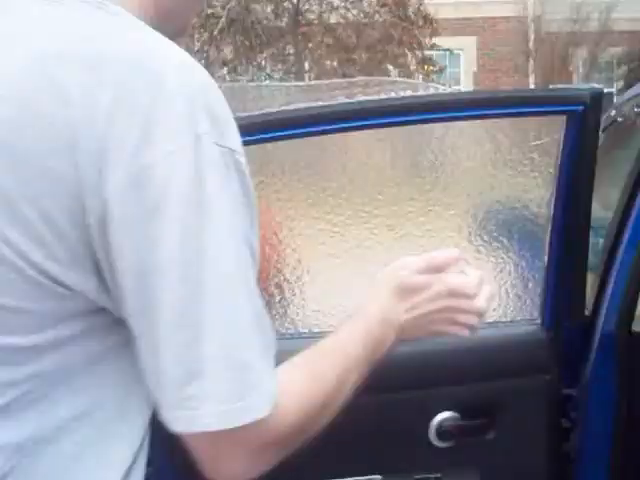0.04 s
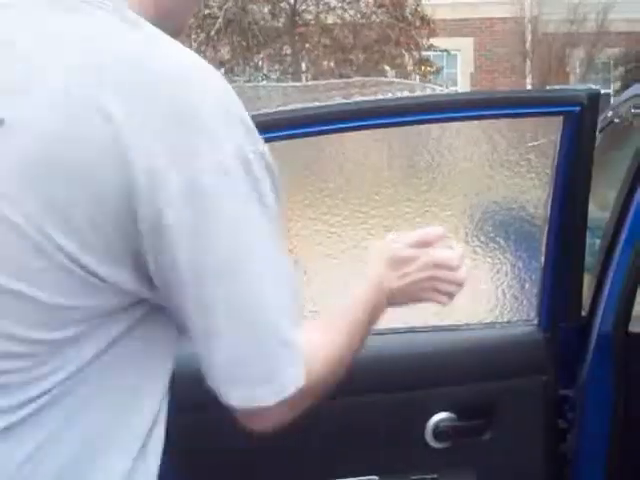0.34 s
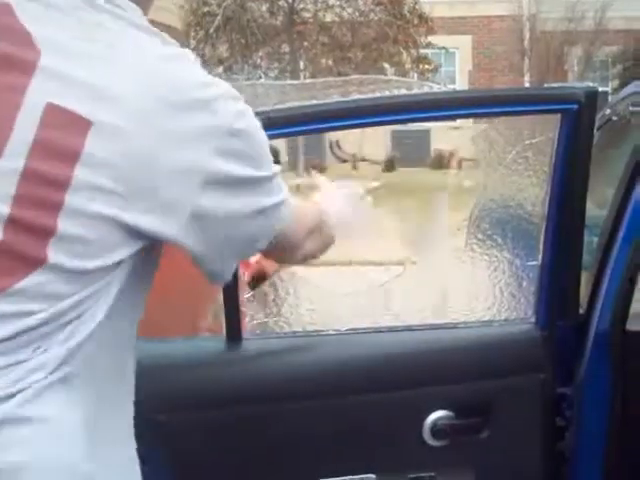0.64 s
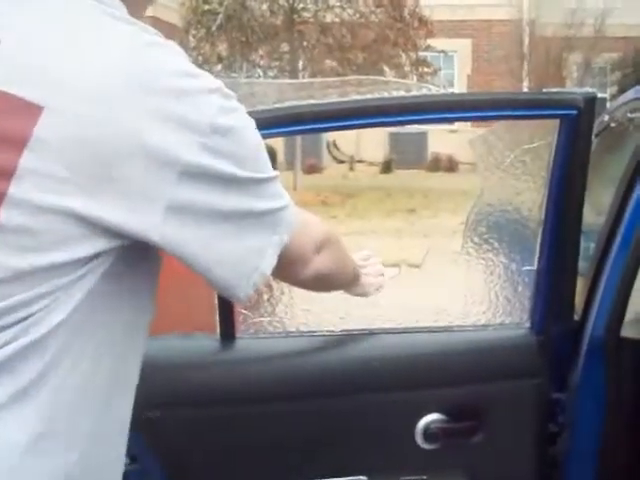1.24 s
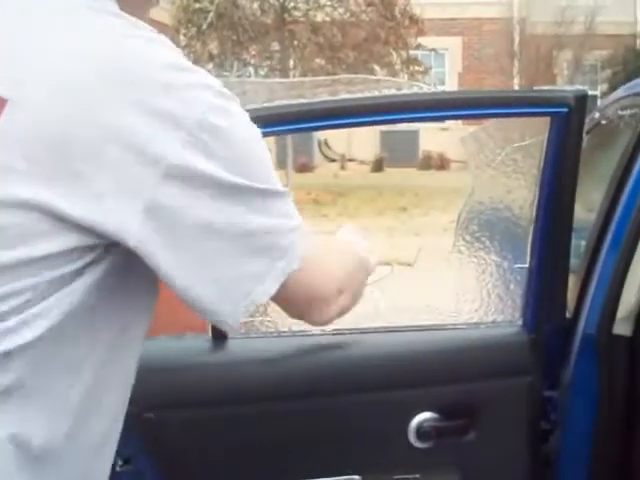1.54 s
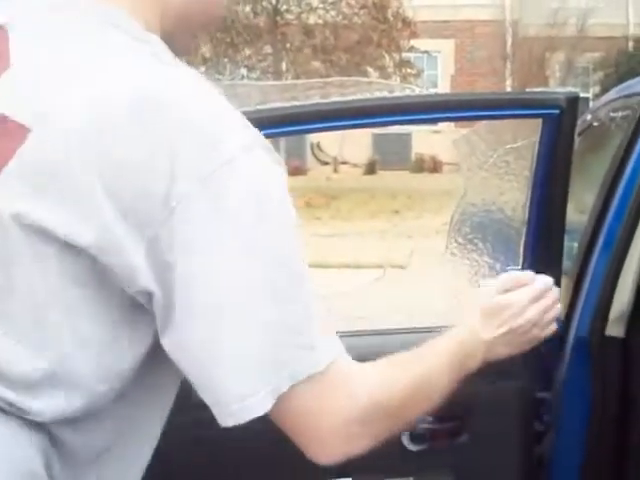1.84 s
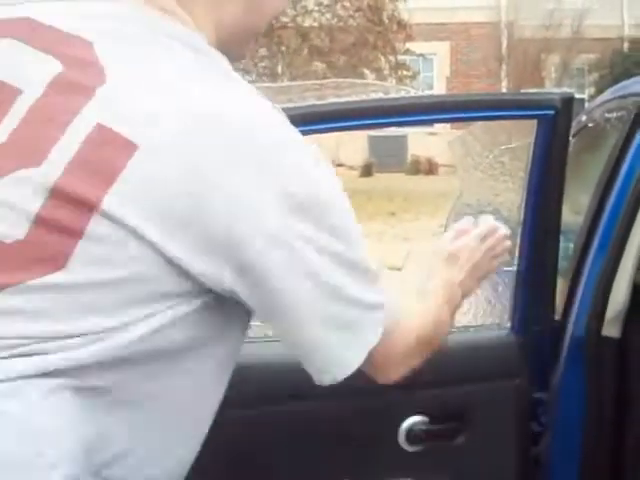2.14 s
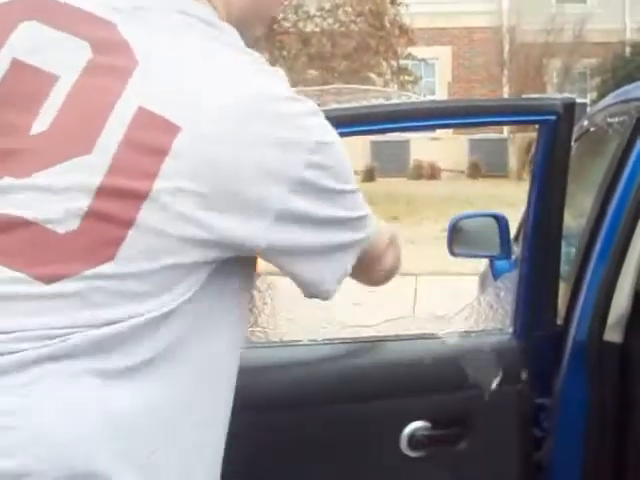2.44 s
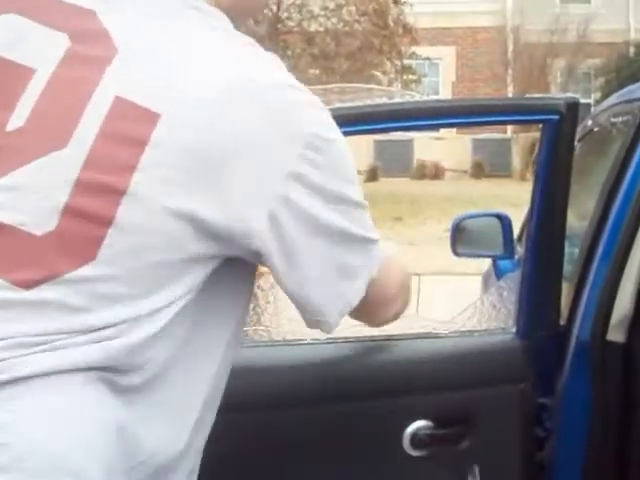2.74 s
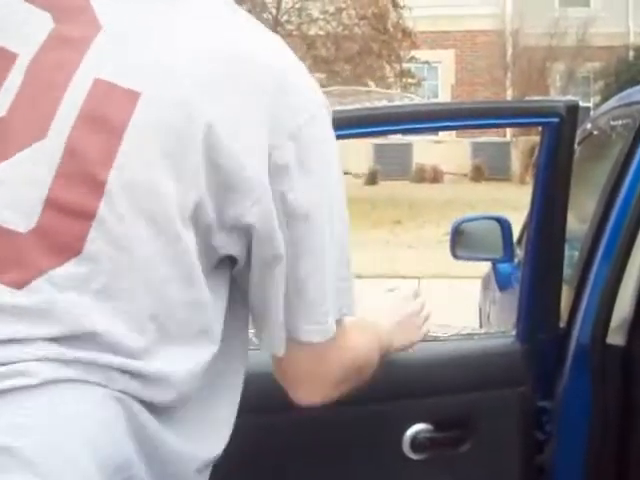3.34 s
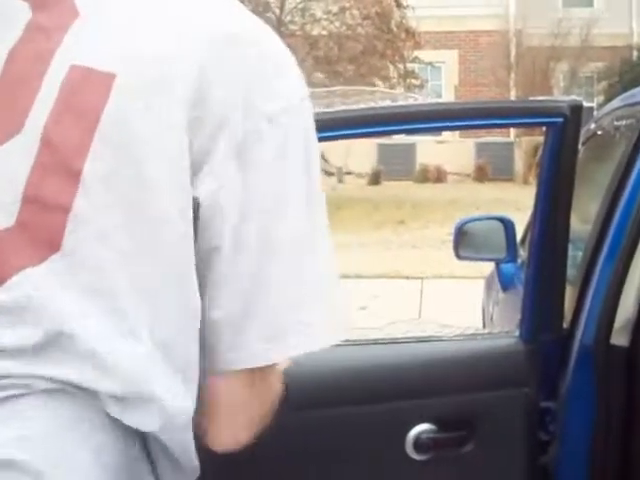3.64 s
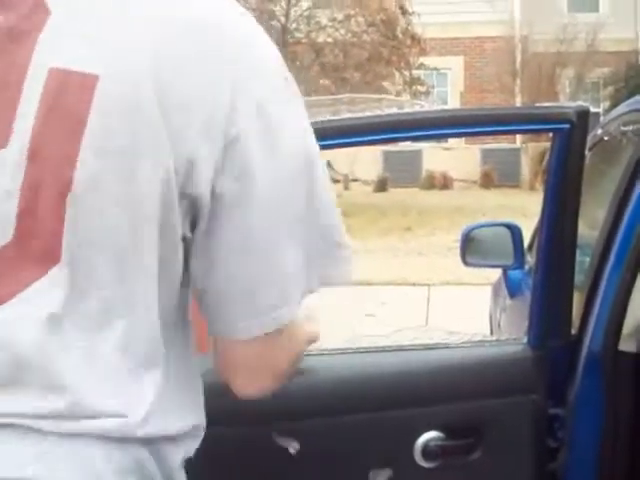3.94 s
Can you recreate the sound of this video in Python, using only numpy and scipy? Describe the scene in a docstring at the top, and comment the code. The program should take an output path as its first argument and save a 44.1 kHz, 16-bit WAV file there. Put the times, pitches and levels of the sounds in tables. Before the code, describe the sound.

Breaking ice crunches and clatters: a hand knocks it from a car door's window twice, each hit followed by shards clinking and scattering on the ground. Underneath are a low engine hum, outdoor air and soft microphone bumps.

```python
"""Knocking ice out of a car window

A hand strikes a sheet of ice in the window frame of an open car door, twice, then knocks off the rest.
Plates crack, bump the door and shatter on the pavement, where shards ring and skitter.
Underneath are the idling engine, outdoor air, faint whines, and wind and handling on the microphone."""
import sys
import numpy as np
from scipy import signal
from scipy.fft import rfft, irfft
from scipy.io import wavfile
from scipy.ndimage import uniform_filter1d

SR = 44100
rng = np.random.default_rng(int(sys.argv[2]) if len(sys.argv) > 2 else 0)


def int16_out(signal):
    """Quantize to a 16-bit WAV file."""
    q = np.round(np.clip(np.atleast_2d(signal).T, -1, 1) * 32767)
    wavfile.write(sys.argv[1], SR, q.astype(np.int16))


N = 4 * SR
TOP_HZ = 7200


def amp(db):
    """Decibels to gain."""
    return 10 ** (np.asarray(db) / 20)


def unit_rms(x):
    """Scale to rms 1."""
    return x / np.sqrt(np.mean(x ** 2) + 1e-20)


def unit_energy(x):
    """Scale to energy 1."""
    return x / np.sqrt(np.sum(x ** 2) + 1e-20)


def curve(table, column=1):
    """One column of a table, interpolated linearly in time."""
    rows = np.array(table)
    return np.interp(np.arange(N) / SR, rows[:, 0], rows[:, column])


def add(out, start_s, x):
    """Mix x into out at start_s."""
    i = max(int(start_s * SR), 0)
    out[i:i + len(x)] += x[:N - i]


def band(x, lo_hz, hi_hz, order=3):
    """Causal band-pass."""
    return signal.sosfilt(signal.butter(order, [lo_hz, hi_hz], "band", fs=SR, output="sos"), x)


def colour(x, points, size=2048):
    """Minimum-phase filter through (Hz, dB) points."""
    hz, db = np.array(points).T
    bins_hz = np.arange(size + 1) * SR / 2 / size
    gain = amp(np.interp(np.log(bins_hz + 1), np.log(hz), db))
    cepstrum = irfft(np.log(gain))
    cepstrum[1:size] *= 2
    cepstrum[size + 1:] = 0
    impulse = irfft(np.exp(rfft(cepstrum)))[:size]
    return signal.fftconvolve(x, impulse)[:len(x)]


def drift(rate_hz):
    """Smooth random drift, rms 1."""
    hold = int(SR / rate_hz)
    steps = np.repeat(rng.standard_normal(N // hold + 1), hold)
    return unit_rms(uniform_filter1d(steps, hold)[:N])


def fade(t, t60_s):
    """Decay by 60 dB in t60_s."""
    return np.exp(-np.log(1000) * t / t60_s)


def rise(t, attack_s=0.004):
    """Exponential onset from 0 to 1."""
    return 1 - np.exp(-t / attack_s)


def sine(hz, t):
    """Sine of peak 1."""
    return np.sin(2 * np.pi * hz * t)


# Each row: time in seconds, firing rate in Hz, level in dB.
IDLE = [(0, 56.76, -34.5), (1.1, 58.77, -36), (1.6, 56.28, -34.5), (2.1, 57.7, -31), (3.2, 56.77, -32),
        (4, 57.26, -35)]
# Each row: multiple of the firing rate, relative level in dB, depth of random dips in dB.
IDLE_HARMONICS = [(1, 1, 1.9), (2, -9, 9)]

def engine():
    """The idling engine hums, wavering, at harmonics of its firing rate."""
    phase = 2 * np.pi * np.cumsum(curve(IDLE)) / SR
    hum = sum(amp(db - dip_db * np.abs(drift(7.1))) * np.sin(round(k) * phase)
              for k, db, dip_db in IDLE_HARMONICS)
    return unit_rms(hum) * amp(curve(IDLE, column=2))


# Each row: frequency in Hz, relative gain in dB.
AIR_SPECTRUM = [(140, 1), (350, -8), (700, -14), (1300, -15.5), (2600, -29), (5300, -32.5), (7000, -67.5)]

def air(level_db=-47.5):
    """Outdoor air: a steady, dark hiss."""
    hiss = colour(rng.standard_normal(N), AIR_SPECTRUM)
    return amp(level_db) * unit_rms(band(hiss, 130, 2 * TOP_HZ))


# Each row: time in seconds, level in dB.
WIND_LEVELS = [(0, -34), (.3, -48), (.45, -36), (.7, -43.5), (3.05, -45.5), (3.4, -37), (3.7, -41),
               (3.92, -36.5)]
# Each row: frequency in Hz, relative gain in dB.
WIND_SPECTRUM = [(10, 7), (35, 7.5), (90, 4), (165, -7.5), (260, -43.5), (600, -54)]

def wind():
    """Gusts rumble on the microphone."""
    return unit_rms(colour(rng.standard_normal(N), WIND_SPECTRUM)) * amp(curve(WIND_LEVELS))


# Each row: frequency in Hz, level in dB.
WHISTLE_TONES = [(5362, -67), (6638, -76.5)]

def whistle():
    """A thin, continuous electrical whistle with a slight flutter."""
    t = np.arange(N) / SR
    return sum(amp(db) * unit_rms(sine(hz, t) * (1 + 0.19 * drift(160))) for hz, db in WHISTLE_TONES)


def plate(modes_hz, t60_s=0.023, tick=3.0, ring=0.66, size=3000):
    """Impulse response of an ice plate: a contact tick and short modes."""
    t = np.arange(size) / SR
    response = ring * unit_energy(sum(sine(hz, t) for hz in modes_hz) * fade(t, t60_s))
    response[0] += tick
    return response


LEAD_S = 0.005
BODY_EDGE_HZ, MID_EDGE_HZ, TREBLE_EDGE_HZ = 157, 747, 2424  # lower band edges
# Each row: frequency in Hz, relative gain in dB.
ICE_SPECTRUM = [(170, -2), (350, 1.5), (480, -5.5), (680, -5), (1000, 7), (1300, 7), (1800, 13), (2200, 7),
                (3400, 8.5), (4000, 6.5), (5400, 5), (6300, -3.5), (7000, -16)]

def fracture(crumble_s, body_db, mid_db, treble_db, cracks_per_s=2900, size=5000, mode_count=16):
    """Faint ticks, a main crack at LEAD_S and a run of further cracks ring one plate."""
    main = int(LEAD_S * SR)
    t = (np.arange(size) - main) / SR
    decay_s = np.sqrt(0.0092 * crumble_s)  # longer breaks die away more slowly
    cracks = (rng.random(size) < cracks_per_s / SR) * rng.choice([-1, 1], size)
    cracks = cracks * amp(4.5 * rng.standard_normal(size).clip(-2, 2))
    cracks[main] = amp(4)
    lead_in = amp(-17) * (1 + t / LEAD_S)
    crumbling = np.exp(-np.maximum(t - crumble_s, 0) / decay_s)
    cracks *= np.where(t < 0, lead_in, crumbling)
    positions = (np.arange(mode_count) + rng.random(mode_count)) / mode_count
    modes_hz = MID_EDGE_HZ + (TOP_HZ - MID_EDGE_HZ) * positions ** 1.4
    crunch = colour(signal.fftconvolve(cracks, plate(modes_hz))[:size], ICE_SPECTRUM)
    edges_hz = [BODY_EDGE_HZ, MID_EDGE_HZ, TREBLE_EDGE_HZ, 2 * TOP_HZ]
    bands = [amp(db) * unit_energy(band(crunch, lo, hi, order=4))
             for db, lo, hi in zip((body_db, mid_db, treble_db), edges_hz, edges_hz[1:])]
    return sum(bands) * np.sqrt((crumble_s + decay_s / 2) * SR)  # energy grows with duration


# Each row: start and crumbling time in seconds, then body, mid and treble levels in dB.
PIECES = [(0.07, 0.0038, -69, -44.5, -47.5), (.379, 0.0016, -13.5, -39, -24.5),
          (0.443, 0.02, -39.5, -55, -44), (0.506, 0.0044, -38.5, -50, -47.5),
          (0.599, 0.0017, -21.5, -23.5, -29), (0.637, 0.011, -27, -29.5, -30),
          (0.678, 0.0021, -29, -25, -39), (0.72, 0.0046, -39.5, -36.5, -46.5),
          (0.773, 0.011, -42.5, -43.5, -48.5), (.827, 0.0031, -33, -36.5, -37),
          (0.8507, 0.004, -28, -27.5, -20.5), (0.876, 0.0025, -32, -22, -26),
          (.883, 0.0043, -31.5, -34, -22), (0.91, 0.0016, -36, -54, -21.5),
          (0.929, 0.0064, -36, -24, -21.5), (0.957, 0.0047, -30.5, -34, -35.5),
          (0.974, 0.0055, -31.5, -26.5, -41), (1.006, 0.0012, -38, -23, -30),
          (1.025, 0.0016, -31.5, -36, -23), (1.036, 0.0012, -42, -16, -24), (1.045, 0.0046, -44, -23, -25),
          (1.061, 0.0043, -39, -25.5, -20.5), (1.073, 0.0012, -38, -28, -21),
          (1.095, 0.0031, -53, -30, -23), (1.101, .0015, -45, -33, -21), (1.111, 0.0071, -38.5, -49, -27.5),
          (1.127, 0.0071, -34.5, -29, -19.5), (1.171, 0.011, -46, -59, -31.5),
          (1.208, 0.013, -40.5, -40.5, -26.5), (1.23, 0.002, -54, -22.5, -24.5),
          (1.245, 0.0024, -41, -30, -22.5), (1.282, 0.0054, -43.5, -48, -33),
          (1.449, 0.002, -49, -54, -33.5), (1.501, 0.0026, -54, -47, -36.5), (1.623, 0.0035, -52, -49, -43),
          (1.895, 0.0017, -67, -76.5, -43.5), (1.954, 0.0043, -70, -65, -49),
          (2.14, 0.0011, -19, -19, -22.5), (2.15, 0.0015, -24, -29, -31), (2.298, 0.0013, -61, -43, -37),
          (2.4, 0.0013, -33, -23, -24), (2.408, 0.0032, -22, -27, -29.5),
          (2.4252, 0.0012, -25.5, -21.5, -35.5), (2.435, 0.0021, -25.5, -29, -22.5),
          (2.441, 0.0036, -30, -25.5, -35), (2.482, 0.017, -38.5, -36.5, -66),
          (2.493, 0.0024, -36.5, -29, -20), (2.623, 0.0027, -44, -39, -34.5), (2.635, 0.003, -44, -33, -27),
          (2.657, 0.0078, -46.5, -27, -29), (2.687, 0.017, -45.5, -37, -29),
          (2.746, 0.0062, -40.5, -32, -33.5), (2.768, 0.0031, -53, -39, -23),
          (2.799, 0.0059, -57, -36, -27), (2.865, 0.0094, -57.5, -41.5, -36),
          (2.933, 0.00076, -47, -37, -23), (2.942, 0.0027, -50, -51, -28),
          (2.979, 0.008, -30.5, -28.5, -27), (3.01, 0.0013, -50, -45, -23.5),
          (3.123, 0.012, -58.5, -82, -34.5), (3.495, 0.0043, -75, -32, -28),
          (3.657, 0.0026, -80, -37.5, -43.5), (3.707, 0.0067, -30, -46, -61.5),
          (3.715, 0.0019, -31, -21, -26.5), (3.816, 0.004, -52, -42, -42.5),
          (3.872, 0.0015, -34.5, -29, -26)]

def breaking_pieces():
    """Ice splits; loose plates knock on the door and burst on the ground."""
    out = np.zeros(N)
    for start_s, *piece in PIECES:
        add(out, start_s - LEAD_S, fracture(*piece))
    return out


# Each row: start in seconds, end in seconds, level in dB.
WHINE_SPANS = [(.12, 0.36, -62), (2.22, 2.603, -59.5), (3.321, 3.48, -57.5)]

def whine(pitch_hz=2320, jitter_hz=10):
    """A faint electrical whine comes and goes."""
    t = np.arange(N) / SR
    gate = sum(amp(db) * ((t > start_s) & (t < end_s)) for start_s, end_s, db in WHINE_SPANS)
    phase = 2 * np.pi * np.cumsum(pitch_hz + jitter_hz * drift(160)) / SR
    return uniform_filter1d(gate, size=900) * unit_rms(np.sin(phase))


# Each row: bending mode frequency in Hz, level in dB.
SHEET_MODES = [(665, -9.5), (850, -10.5), (990, -16)]
# Each row: start and crumbling time in seconds, body, mid, treble and thump levels in dB, thump in Hz.
BLOWS = [(0.3632, 0.011, -26, -23.5, -26.5, -4.5, 192), (2.136, 0.004, -23, -30.5, -27.5, -11, 298)]

def hand_blows(sheet_t60_s=0.03, thump_t60_s=0.02):
    """The palm shoves the sheet, which thumps, bends and splits; the smaller remnant thumps higher."""
    out, t = np.zeros(N), np.arange(3000) / SR
    bending = sum(amp(db) * sine(hz, t) for hz, db in SHEET_MODES) * fade(t, sheet_t60_s) * rise(t)
    for start_s, *split, thump_db, thump_hz in BLOWS:
        thump = amp(thump_db) * sine(thump_hz, t) * fade(t, thump_t60_s)
        add(out, start_s - LEAD_S, fracture(*split))
        add(out, start_s, thump + bending)
    return out


def fragments(lo_hz, hi_hz, bounces_per_s=200, ring_t60_s=0.13, scrape_t60_s=0.019, size=1400):
    """A steady rain of fragments: each scrapes the ground and rings at two pitches."""
    out, t = np.zeros(N), np.arange(size) / SR
    ring_decay, scrape_decay = unit_energy(fade(t, ring_t60_s)), unit_energy(fade(t, scrape_t60_s))
    for when, pitch, overtone, strength in rng.random((bounces_per_s * N // SR, 4)):
        hz = lo_hz + (hi_hz - lo_hz) * pitch
        ring = ring_decay * (sine(hz, t) + 0.5 * sine(hz * (1 + overtone), t))
        scrape = 3 * scrape_decay * rng.standard_normal(size)
        bounce_db = -6.5 * np.log(strength + 0.02)  # many soft, few loud
        add(out, when * N / SR, amp(bounce_db) * (ring + scrape))
    rain = unit_rms(band(colour(out, ICE_SPECTRUM), 0.67 * lo_hz, 2.17 * hi_hz, order=2))
    return rain / np.sqrt(uniform_filter1d(rain ** 2, size) + 0.14)  # evens out the level


# Each row: time in seconds, gain of large fragments in dB, gain of small fragments in dB.
SKITTER_GAINS = [(.36, -64, -83), (.39, -47, -41), (.55, -57.5, -65), (.83, -53, -69), (.9, -44, -38),
                 (1.06, -36, -24.5), (1.17, -37.5, -42.5), (1.25, -38, -33.5), (1.36, -50.5, -37),
                 (1.65, -54, -54.5), (1.85, -68, -67), (2.13, -89, -68), (2.17, -43, -48.5),
                 (2.33, -58, -62), (2.46, -58, -75), (2.61, -58, -76), (2.64, -46, -35.5),
                 (2.78, -39.5, -33), (2.85, -45, -47), (2.96, -31.5, -34.5), (3.06, -48.5, -44),
                 (3.3, -55, -60.5), (3.48, -63, -81), (3.52, -50, -39.5), (4, -61, -81)]

def skitter():
    """Fragments scatter over the pavement in waves; small ones ring higher."""
    large = fragments(1100, 2000) * amp(curve(SKITTER_GAINS))
    small = fragments(2700, 4500) * amp(curve(SKITTER_GAINS, column=2))
    return large + small


# Each row: start in seconds, frequency in Hz, level in dB, T60 in seconds.
LOW_BUMPS = [(0.723, 240, -21, 0.055), (3.197, 167.1, -32.5, 0.21), (3.714, 410, -18, 0.054),
             (3.905, 110, -15.5, 0.052)]

def low_bumps():
    """Dull low thuds: ice landing on the door, and handling bumps on the microphone."""
    out, t = np.zeros(N), np.arange(7000) / SR
    for start_s, hz, db, t60_s in LOW_BUMPS:
        add(out, start_s, amp(db) * sine(hz, t) * fade(t, t60_s) * rise(t))
    return out


# Each row: start in seconds, frequency in Hz, level in dB, T60 in seconds.
SHARDS = [(0.91, 3400, -26.5, 0.1), (1.096, 3385, -18, 0.04), (1.289, 2780, -21.5, 0.039),
          (1.31, 4400, -28.5, 0.033), (1.347, 3054, -22.5, 0.053), (1.411, 2290, -26.5, 0.024),
          (1.535, 3540, -37.5, 0.15), (2.398, 5800, -20, 0.021), (2.437, 4540, -13, 0.014),
          (2.802, 3050, -17, 0.034), (2.868, 2620, -23, 0.045), (2.925, 3440, -24, .035),
          (2.934, 1740, -25.5, 0.051), (2.982, 1630, -16.5, 0.029), (3.051, 1745, -39.5, 0.26),
          (3.106, 1754, -33.5, 0.061), (3.197, 3450, -31.5, 0.026), (3.257, 2772, -35.5, 0.047)]

def ringing_shards(detune=0.06):
    """A shard that lands free clinks with a close pair of modes."""
    out, t = np.zeros(N), np.arange(6000) / SR
    for start_s, hz, db, t60_s in SHARDS:
        partner_hz = hz * (1 + detune * rng.standard_normal())
        pair = sine(hz, t) + 0.5 * sine(partner_hz, t)
        add(out, start_s, amp(db) * pair * fade(t, t60_s))
    return out


def with_reflections(x, t60_s=0.1, wet_db=-15.5):
    """Add quick reflections from the door, the cabin and the pavement."""
    t = np.arange(14000) / SR
    tail = unit_energy(rng.standard_normal(len(t)) * fade(t, t60_s) * rise(t, attack_s=0.014))
    return x + amp(wet_db) * signal.fftconvolve(x, tail)[:N]


def scene():
    """Breaking and falling ice over the idling car, in mono."""
    ice = with_reflections(skitter() + hand_blows() + breaking_pieces() + ringing_shards())
    return (ice + low_bumps() + engine() + air() + wind() + whine() + whistle())[None]


def record(dry, ceiling=0.52):
    """The microphone passes little above TOP_HZ; the loudest cracks overload with a bright snap."""
    heard = signal.sosfilt(signal.ellip(8, 0.3, 55, TOP_HZ, fs=SR, output="sos"), dry)
    clipped = heard / (1 + (heard / ceiling) ** 10) ** (1 / 10)
    return signal.sosfilt(signal.ellip(8, 0.3, 70, 15000, fs=SR, output="sos"), clipped)


dry = scene()
out = record(dry)
int16_out(out)
```